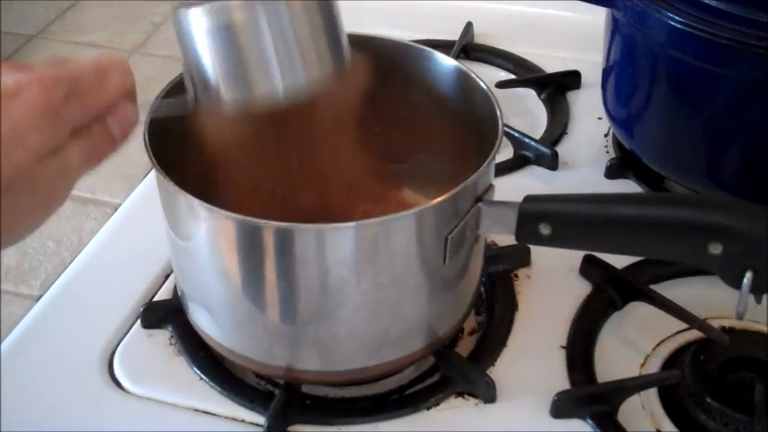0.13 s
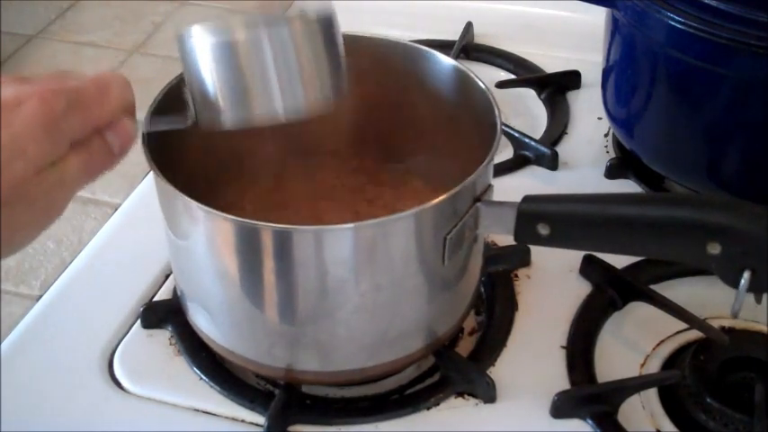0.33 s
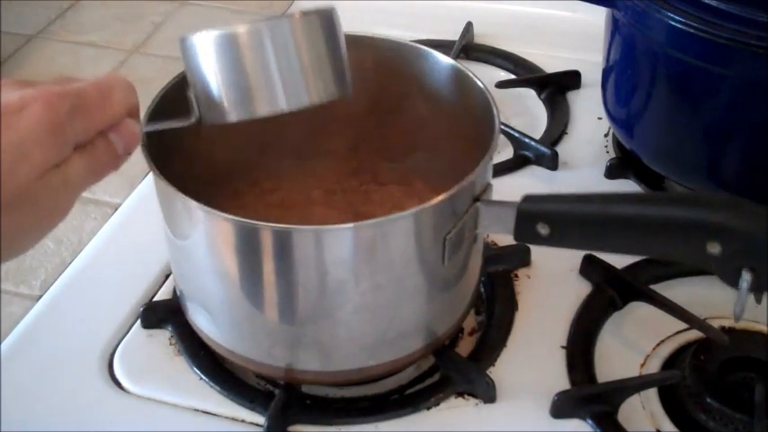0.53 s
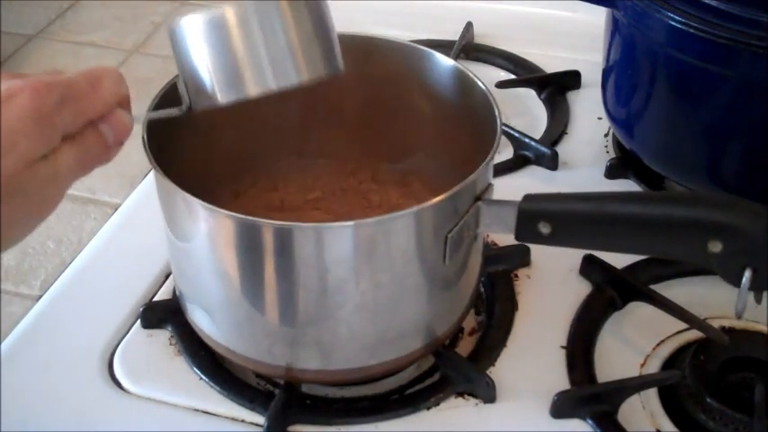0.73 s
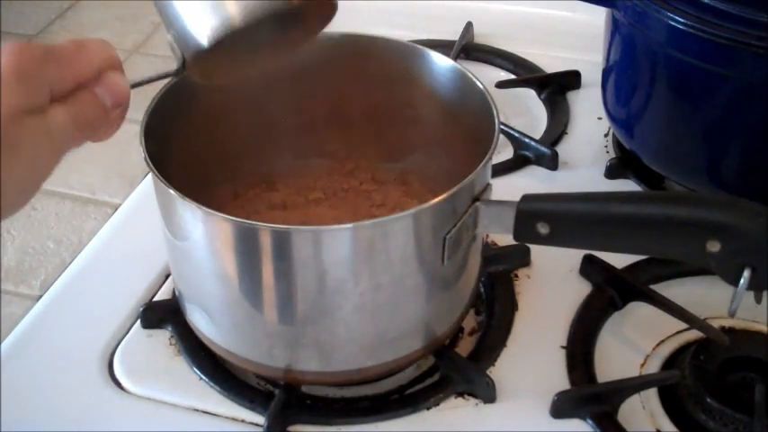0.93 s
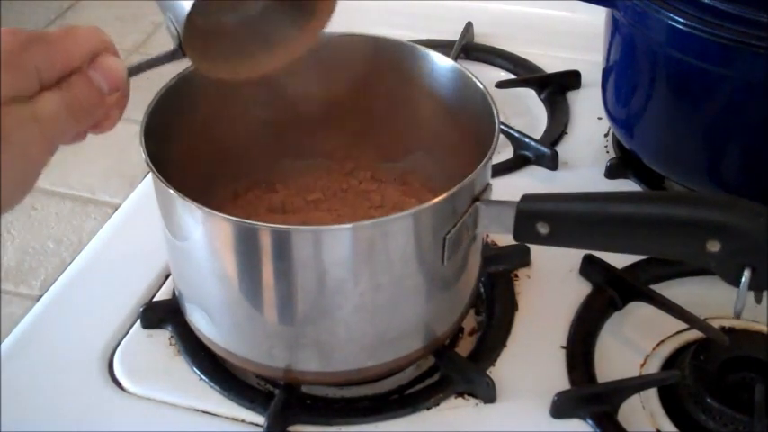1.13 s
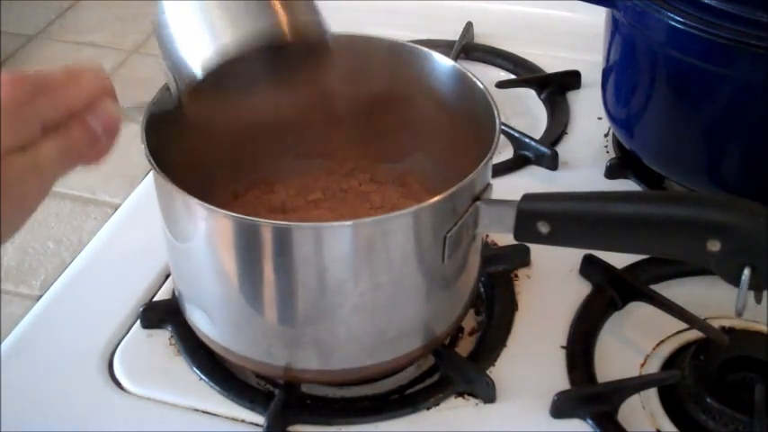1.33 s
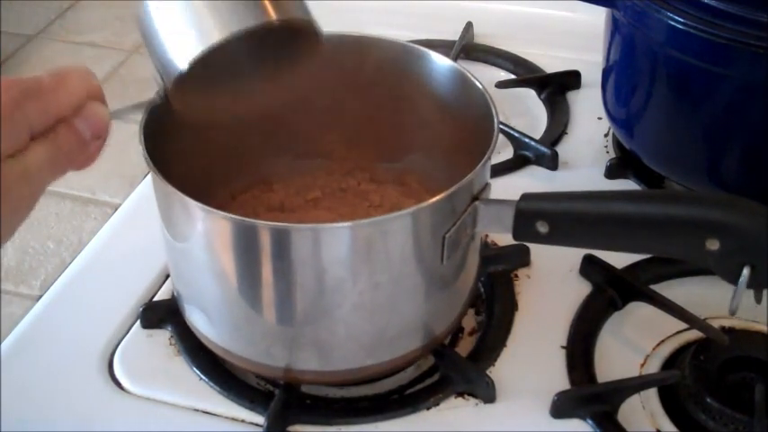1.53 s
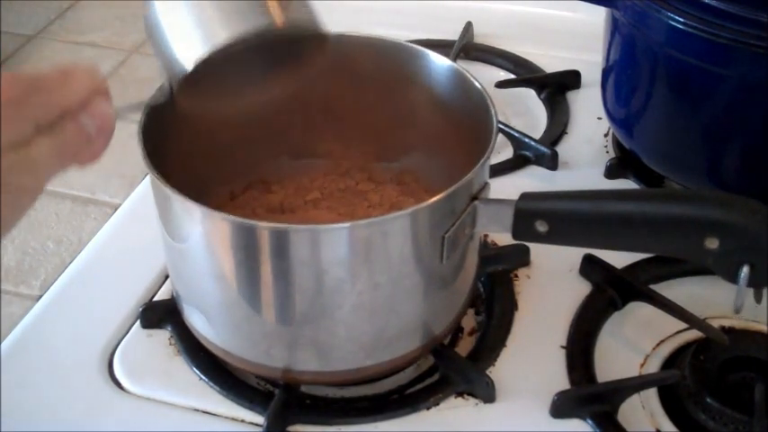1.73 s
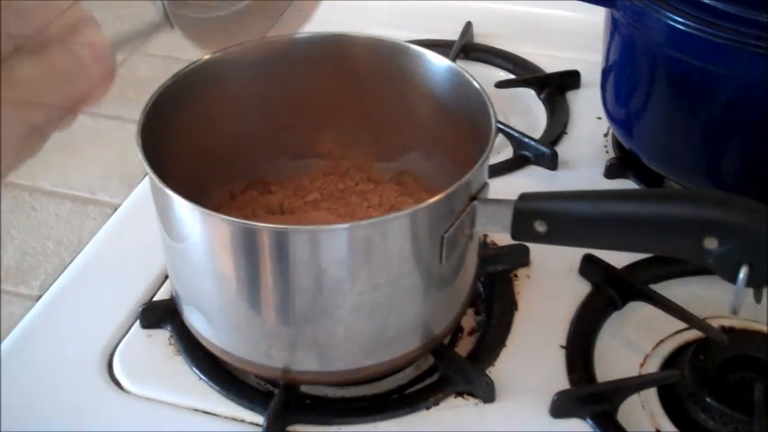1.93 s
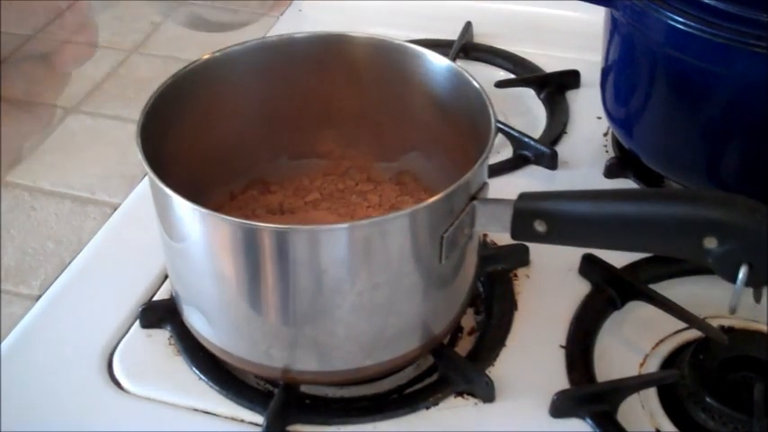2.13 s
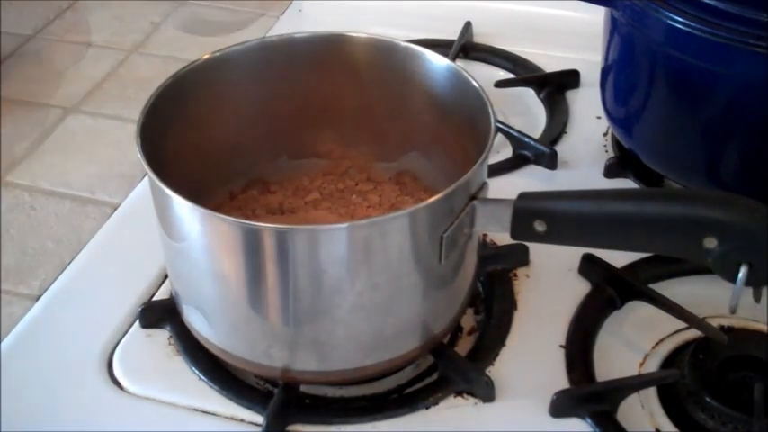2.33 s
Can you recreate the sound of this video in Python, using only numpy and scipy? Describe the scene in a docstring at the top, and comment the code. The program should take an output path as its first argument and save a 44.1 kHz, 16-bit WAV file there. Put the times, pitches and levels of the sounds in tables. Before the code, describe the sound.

A spoon taps a steel measuring cup six times quickly, pauses, then gives three harder taps. Each clinks and rings, followed by powder hissing into a saucepan. The microphone is close, in a small kitchen with a faint hum.

```python
"""In a small kitchen, a spoon taps a steel measuring cup nine times over a saucepan.
Each tap clinks and sets the cup ringing; a moment later the loosened powder lands in the pan,
hissing and gritty. The last three taps are harder, on the nearly empty cup. An appliance hums
faintly, and the close stereo microphone overloads as the taps hit."""
import sys
import numpy as np
from scipy import signal
from scipy.fft import rfft, irfft
from scipy.io import wavfile
from scipy.ndimage import uniform_filter1d

SR = 44100
rng = np.random.default_rng(int(sys.argv[2]) if len(sys.argv) > 2 else 0)


def dump(signal):
    """Clip the signal to [-1, 1] and save it as 16-bit WAV at the path in sys.argv[1]."""
    limited = np.clip(np.atleast_2d(signal).T, -1, 1)
    pcm = np.round(limited * 32767).astype(np.int16)
    wavfile.write(sys.argv[1], SR, pcm)


N = 109147


def amp(db):
    """Turns decibels (dB) into a number to multiply by."""
    return 10 ** (np.asarray(db) / 20)


def fade(t, fade_s):
    """Dies away by 60 dB in fade_s seconds: the "fade time" used below."""
    return amp(-60 * t / fade_s)


def unit(x):
    """Scales a sound to an average (rms) strength of one."""
    return x / np.sqrt(np.mean(x ** 2) + 1e-20)


def read(points, hz):
    """Reads between a table's rows, on a scale of musical pitch."""
    row_hz, value = np.transpose(points)
    return np.interp(np.log(hz + 1), np.log(row_hz + 1), value)


def add(mix, start, sound):
    """Mixes a sound in at a start time in seconds."""
    part = mix[:, max(round(start * SR), 0):][:, :sound.shape[-1]]
    part += sound[..., :part.shape[1]]


# How alike left and right hear scattered sound. Each row: frequency in Hz, likeness from 0 to 1.
LIKENESS = [(50, 0.9), (300, 0.99), (1000, 0.91), (2500, 0.38), (7000, 0.3), (14000, 0.7)]

def colour(pair, spectrum):
    """Shapes the bass and treble of two unrelated sounds and blends them into left and right."""
    hz = np.fft.rfftfreq(pair.shape[1], 1 / SR)
    left, other = rfft(pair)
    same = np.clip(read(LIKENESS, hz), 0, 1)
    right = same * left + np.sqrt(1 - same ** 2) * other
    return unit(irfft(np.array([left, right]) * amp(read(spectrum, hz)), pair.shape[1]))


def noise(size, spectrum):
    """Stereo noise with the given tone colour."""
    return colour(rng.standard_normal((2, size)), spectrum)


# The quiet of the kitchen. Each row: frequency in Hz, relative level in dB.
ROOM_NOISE = [(25, -31), (80, -8), (150, -15), (235, 0), (300, -13.5), (400, -4.5), (700, -9), (1300, -14),
              (4500, -21), (6500, -17.5), (8000, -23.5), (10000, -33), (14000, -39.5), (15000, -46)]
ROOM_NOISE_DB, HUM_HZ, HUM_DB = -50.5, 237, -62

def background():
    """Quiet room noise with a faint appliance hum."""
    hum = unit(np.sin(2 * np.pi * HUM_HZ * np.arange(N) / SR))
    return amp(ROOM_NOISE_DB) * noise(N, ROOM_NOISE) + amp(HUM_DB) * hum


# How long the kitchen echoes. Each row: frequency in Hz, fade time in seconds.
ECHO_FADES = [(100, 0.54), (300, 0.72), (1200, 0.2), (3000, 0.3), (7000, 0.14), (14000, 0.14)]
TAIL_DB, STOVE_DB, STOVE_DELAY_S, STOVE_SPREAD_S = -14.5, -15.5, 0.0073, 0.0065

def kitchen_echo(sound):
    """Sound bounces brightly off the stove, then dies away in the room."""
    size = SR * 3 // 4
    hz, frame_s, bands = signal.stft(noise(size, [(20, 0), (20000, 0)]), SR, nperseg=256)
    bands = bands * fade(frame_s, read(ECHO_FADES, hz)[:, None])
    tail = signal.istft(bands, SR, nperseg=256)[1][:, :size]
    t = np.arange(size) / SR
    tail *= np.clip((t - STOVE_DELAY_S) / STOVE_DELAY_S, 0, 1)
    stove = rng.standard_normal((2, size)) * (t > STOVE_DELAY_S) * (t < STOVE_DELAY_S + STOVE_SPREAD_S)
    stove = signal.sosfilt(signal.butter(2, 2500, "high", fs=SR, output="sos"), stove)
    echo = amp(TAIL_DB) * tail / np.linalg.norm(tail[0])
    echo += amp(STOVE_DB) * stove / np.linalg.norm(stove[0])
    return signal.fftconvolve(sound, echo, axes=1)[:, :N]


def landings(per_s, max_db):
    """Clicks at random moments, one for each grain: mostly small, a few big."""
    size_db = np.minimum(2 * rng.exponential(1, N), max_db)
    return (rng.random((1, N)) < per_s / SR) * amp(size_db)


def grains(per_s, fade_s, spots=12):
    """Grains of uneven size land, each ringing one of several spots on the pan."""
    t, out = np.arange(2048) / SR, np.zeros((2, N))
    for _ in range(spots):
        hits = landings(per_s / spots, max_db=7) * rng.choice([-1, 1], N)
        spot_ring = rng.standard_normal((2, len(t))) * fade(t, fade_s)
        out += signal.oaconvolve(hits, spot_ring, axes=1)[:, :N]
    return out


def pings(per_s, fade_s):
    """Coarse grains strike steel, each waking one of the clink's bright tones (listed further down)."""
    t, out = np.arange(SR // 8) / SR, np.zeros((2, N))
    for hz, _, _ in CLINK_TONES:
        hits = landings(per_s / len(CLINK_TONES), max_db=6)
        tone = fade(t, fade_s) * np.sin(2 * np.pi * (hz * t + rng.random((2, 1))))
        out += signal.oaconvolve(hits, tone, axes=1)[:, :N]
    return out


# Fine powder, then coarse grains, on steel. Each row: frequency in Hz, relative level in dB.
HISS_COLOUR = [(30, -39), (90, -9.5), (150, -8.5), (240, -0.5), (340, 9), (450, -4), (600, 0), (1200, 2.5),
               (2400, 1), (4000, -6), (6500, -3), (9000, -12), (11500, -34.5), (15000, -59)]
GRIT_COLOUR = [(300, -30.5), (3000, -5.5), (5000, 2.5), (6300, 4), (7000, 0.5), (7700, 6.5), (9200, -10.5),
               (11500, -20), (13200, -40.5), (13650, -11.5), (14200, -45.5), (15000, -69)]
# Powder falling into the pan. Each row: start, rise time, hold time and fade time in seconds,
# then hiss level and grit level in dB.
POWDER_FALLS = [(-0.03, 0.025, 0.032, 0.21, -34, -37), (0.053, 0.0076, 0.012, 0.32, -27, -28.5),
                (0.164, 0.047, 0.011, 0.25, -21.5, -26), (0.231, .003, 0.0081, 0.34, -49, -20.5),
                (0.334, 0.025, 0.018, 0.23, -24, -20.5), (0.509, 0.019, 0.019, 0.24, -26.5, -22),
                (0.663, 0.031, 0.036, 0.37, -23, -22), (0.808, 0.011, 0.068, 0.41, -23.5, -22),
                (0.898, 0.012, 0.071, 0.19, -29.5, -24.5), (1.403, 0.021, 0.037, 0.31, -23.5, -24.5),
                (1.537, 0.0077, 0.011, 0.25, -35, -31), (1.58, 0.0094, 0.017, 0.55, -22, -21),
                (1.775, 0.015, 0.013, 0.33, -29, -31), (1.857, 0.018, 0.044, 0.15, -37.5, -44)]
PING_DB = 3.5

def powder():
    """Each fall swells, holds and trickles out: fine powder hisses, grit patters and pings."""
    t, hiss_power, grit_power = np.arange(N) / SR, np.zeros(N), np.zeros(N)
    for start, rise, hold, fade_s, hiss_db, grit_db in POWDER_FALLS:
        flow = np.clip((t - start) / rise, 0, 1) * fade(np.maximum(t - start - rise - hold, 0), fade_s)
        hiss_power += (flow * amp(hiss_db)) ** 2
        grit_power += (flow * amp(grit_db)) ** 2
    patter = colour(grains(per_s=600, fade_s=0.057), GRIT_COLOUR)
    pinging = amp(PING_DB) * colour(pings(per_s=300, fade_s=0.029), GRIT_COLOUR)
    hiss = colour(grains(per_s=6000, fade_s=0.006), HISS_COLOUR)
    return np.sqrt(hiss_power) * hiss + np.sqrt(grit_power) * unit(patter + pinging)


# The dull scrape of a light touch. Each row: frequency in Hz, relative level in dB.
SCRAPE_COLOUR = [(100, -11.5), (500, -5.5), (2500, 8), (4500, 3), (6500, 4.5), (9000, 6), (11500, -26),
                 (15000, -44)]
# The spoon's light touches. Each row: start in seconds, level in dB added to SCRAPE_DB.
SPOON_TOUCHES = [(0.2407, -17.5), (0.309, -13.5), (0.485, -13.5), (0.626, -18.5), (0.721, -22.5),
                 (0.8391, -19), (0.9289, -18)]
SCRAPE_DB, SCRAPE_RISE_S = -6.5, 0.001

def touches():
    """The spoon brushes the cup just before or after a tap."""
    t, out = np.arange(SR // 2) / SR, np.zeros((2, N))
    shape = np.minimum(t / SCRAPE_RISE_S, 1) * fade(t, fade_s=0.17)
    for start, db in SPOON_TOUCHES:
        add(out, start, amp(SCRAPE_DB + db) * shape * noise(len(t), SCRAPE_COLOUR))
    return out


def ring(tones, t, fade_scale=1, tilt_db=0, scatter_db=2.2):
    """Struck steel rings with several fading tones, in a slightly different mix each time."""
    out, centre_hz = np.zeros((2, len(t))), np.mean(tones, axis=0)[0]
    for hz, db, fade_s in tones:
        size, turn = rng.standard_normal(2)
        # High tones reach left and right more out of step.
        phase = np.array([[.5], [-.5]]) * 0.68 * turn * hz / 5000
        level_db = db + scatter_db * size + tilt_db * (hz - centre_hz) / 1000
        out += amp(level_db) * fade(t, fade_s * fade_scale) * np.sin(2 * np.pi * hz * t + phase)
    return out


# The snap, then the rattle, of a tap. Each row: frequency in Hz, relative level in dB.
SNAP_COLOUR = [(500, -28), (3000, -10), (6000, 17.5), (10000, 6.5), (13500, -5), (16000, -12.5)]
RATTLE_COLOUR = [(30, -22), (150, -34), (400, -2.5), (800, 3.5), (1500, 0), (2800, -3.5), (4500, -0.5),
                 (6500, 8.5), (9000, 0), (11000, -12.5), (15000, -14.5)]
SNAP_DB, RATTLE_DB = -11, -5

def crack(t):
    """Steel meets steel with a sharp snap and a dense, quickly dying rattle."""
    snap = amp(SNAP_DB) * noise(len(t), SNAP_COLOUR) * fade(t, fade_s=0.02)
    rattle = amp(RATTLE_DB) * noise(len(t), RATTLE_COLOUR) * fade(t, fade_s=0.041)
    return snap + rattle


# Bright tones of cup and spoon, then low tones of handle and pan.
# Each row: pitch in Hz, relative level in dB, fade time in seconds (taps shorten the clink's).
CLINK_TONES = [(3855, -21, .09), (4735, -23, .09), (5535, -21, .09), (5696, -13, .06), (5858, -14, .08),
               (5990, -10, .06), (6119, -16, .07), (6316, -17, .11), (6660, -20, .06), (6845, -14, .06),
               (6960, -16, .04), (7330, -19, .055), (7515, -23, .09), (8007, -18, .06), (8540, -25, .04),
               (9100, -24, .025)]
KNOCK_TONES = [(327.3, -33, 0.31), (589, -29, 0.15), (613.2, -17, 0.11)]
# The nine taps. Each row: start in seconds; clink, crack and cup ring levels in dB; the main note's # pitch in
# Hz and fade time in seconds; knock level in dB; hardness from 0 to 1; rim and wall ping # levels in dB; the
# clink's tilt towards treble in dB per 1000 Hz.
SPOON_TAPS = [(0.0596, 0.5, -12, -29.5, 1145, 0.38, -16.5, 0.46, -26, -20.5, 2.5),
              (0.1470, 6.5, -1.5, -10, 1196, 0.3, -0.5, 0.62, -3, -16, 3.5),
              (0.3170, 8, -3, -14, 1178, 0.31, -1.5, 0.92, 3.5, -8.5, 3),
              (0.4907, 6.5, -5, -12.5, 1183, 0.31, 1.5, 0.82, -0.5, -11, 3),
              (0.6427, 16.5, 3, -13.5, 1181, 0.32, 0.5, 1, 4, -4, 0.5),
              (0.8100, 5.5, -5.5, -8.5, 1180, 0.26, -1, 0.55, 0, -10, 2),
              (1.3832, 4, 6.5, 1.5, 1184, 0.135, -1.5, 1, -16.5, -1.5, -4.5),
              (1.5833, -3, 1.5, -4, 1184, 0.14, -4, 0.87, -7, -36, -4.5),
              (1.7598, 3.5, 0, -1, 1184, 0.14, -8, 0.9, -9.5, -31, 0)]
HARD_DAMPING = 0.68  # share of the clink's fade time lost in the hardest tap
TAP_RISE_S, THUMP_S, THUMP_DB = 0.0002, 0.0045, -25

def taps():
    """The spoon hits the cup: a bright clink, a crack, a thump and a low knock."""
    t, out = np.arange(SR // 2) / SR, np.zeros((2, N))
    attack = 1 - np.exp(-t / TAP_RISE_S)
    for start, clink_db, crack_db, _, _, _, knock_db, hardness, _, _, tilt_db in SPOON_TAPS:
        clink = amp(clink_db) * ring(CLINK_TONES, t, 1 - HARD_DAMPING * hardness, tilt_db)
        contact = amp(crack_db) * crack(t)
        thump = amp(THUMP_DB + crack_db) * hardness ** 2 * (1 - t / THUMP_S) * np.exp(-t / THUMP_S)
        knock = amp(knock_db) * ring(KNOCK_TONES, t)
        add(out, start, attack * (clink + contact + thump + knock))
    return out


# Short tones of the cup wall, then faint, lasting tones of its rim.
# Each row: pitch in Hz, relative level in dB, fade time in seconds.
CLANK_TONES = [(735, -10, .04), (900, -17, .03), (1040, -14, .05), (2980, -14, .03), (3950, -14, .03)]
RIM_TONES = [(3855, -36, .5), (4735, -31, .4), (5530, -32, .5), (6316, -35, .4), (7517, -36, .4)]
WALL_PING_HZ, TWIN_DB, BEAT_HZ = 4600, -20.5, 9
SWELL_SHARE = 0.018  # the main note's swell time as a share of its fade time
FLUTTER_DEPTH, FLUTTER_S = 0.5, 0.02

def cup_ring():
    """The cup wall pings brightly, clanks and swells into its note, and the rim sings until the next tap."""
    out = np.zeros((2, N))
    ends = [tap[0] for tap in SPOON_TAPS[1:]] + [N / SR]
    for (start, _, _, ring_db, hz, fade_s, _, _, rim_db, wall_ping_db, _), end in zip(SPOON_TAPS, ends):
        t = np.arange(0, end - start, 1 / SR)
        wall_ping = amp(wall_ping_db) * fade(t, fade_s=0.042) * np.sin(2 * np.pi * WALL_PING_HZ * t)
        note = fade(t, fade_s) * np.sin(2 * np.pi * hz * t)
        # A slightly higher, longer twin beats against the note, making it wobble.
        twin = amp(TWIN_DB) * fade(t, fade_s=0.42) * np.sin(2 * np.pi * (hz + BEAT_HZ) * t)
        swell = 1 - np.exp(-t / (SWELL_SHARE * fade_s))
        flutter = unit(uniform_filter1d(rng.standard_normal(len(t)), size=round(FLUTTER_S * SR)))
        rim = amp(rim_db) * swell * (1 + FLUTTER_DEPTH * flutter) * ring(RIM_TONES, t)
        wall = amp(ring_db) * (swell * (note + twin) + ring(CLANK_TONES, t))
        add(out, start, wall_ping + wall + rim)
    return out


def last_tone(hz=2321.5, db=-32, fade_s=0.62):
    """One tone sings on from the last tap as the emptied cup is lifted clear."""
    t, out = np.arange(SR) / SR, np.zeros((2, N))
    add(out, SPOON_TAPS[-1][0], amp(db) * fade(t, fade_s) * np.sin(2 * np.pi * hz * t))
    return out


def scene():
    """Taps, touches and powder echo in the kitchen; the cup's ring and the background join them."""
    near = taps() + touches() + powder()
    return near + kitchen_echo(near) + cup_ring() + last_tone() + background()


# The microphone's uneven sides. Each row: frequency in Hz, how much louder the left is in dB.
LEFT_OVER_RIGHT = [(30, 5), (120, 0), (500, 0), (1200, 2.5), (3800, -0.5), (6000, -2.5), (7000, 6.5),
                   (8000, 8), (14000, 14.5)]
CLIP_LEVEL, TREBLE_LIMIT_HZ = 0.76, 15700

def record(dry):
    """The microphone hears left and right unequally, overloads on peaks and loses the top treble."""
    lean_db = read(LEFT_OVER_RIGHT, np.fft.rfftfreq(2 * N, 1 / SR)) * np.array([[.5], [-.5]])
    sides = irfft(rfft(dry, 2 * N) * amp(lean_db))[:, :N]
    clipped = np.clip(sides, -CLIP_LEVEL, CLIP_LEVEL)
    treble_cut = signal.firwin(255, TREBLE_LIMIT_HZ, window=("kaiser", 8), fs=SR)
    return signal.oaconvolve(clipped, treble_cut[None], "same")


dry = scene()
out = record(dry)
dump(out)
```